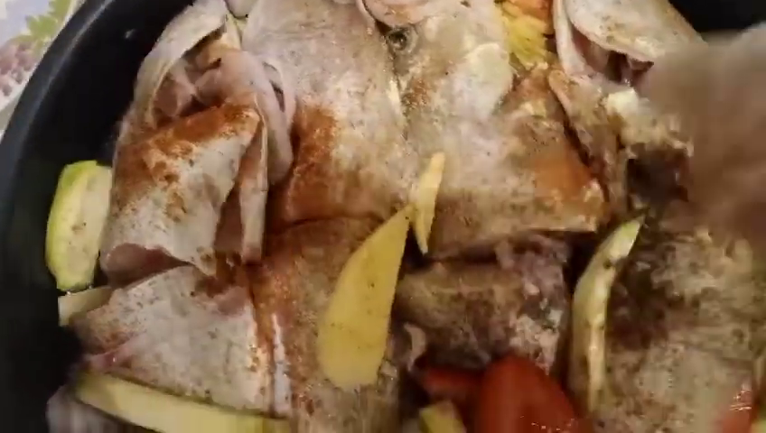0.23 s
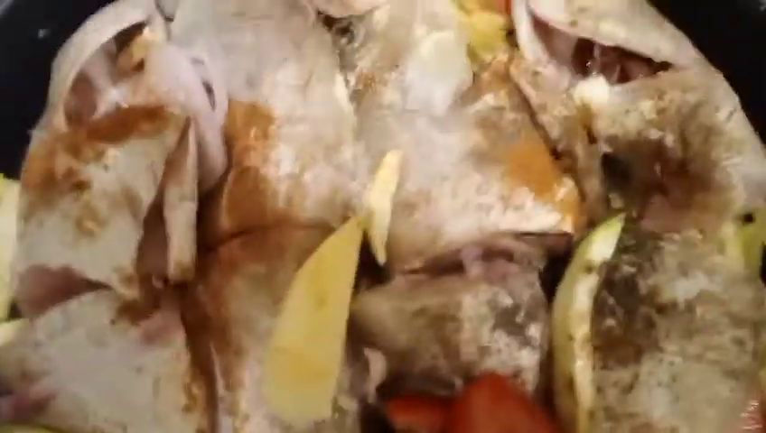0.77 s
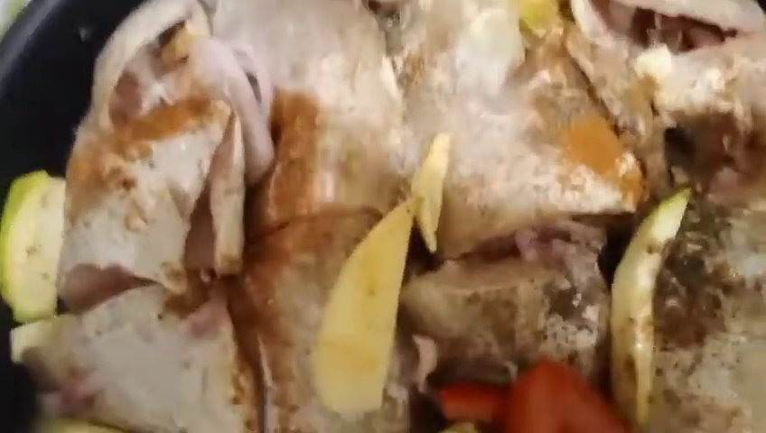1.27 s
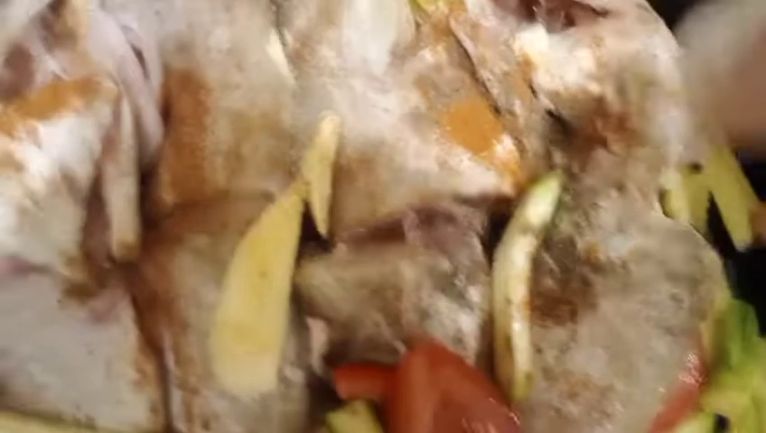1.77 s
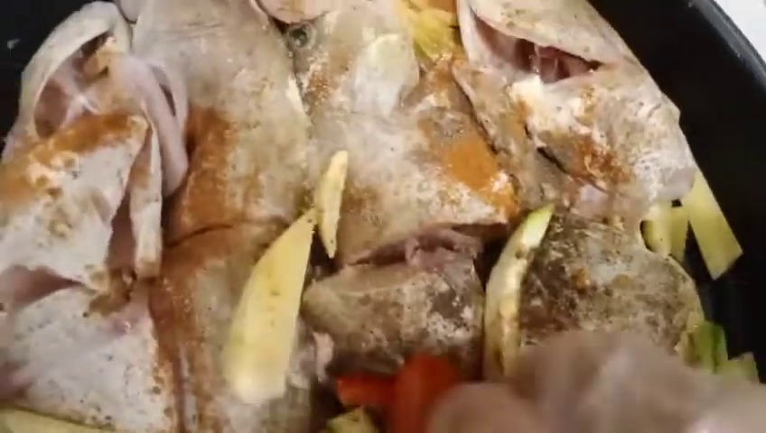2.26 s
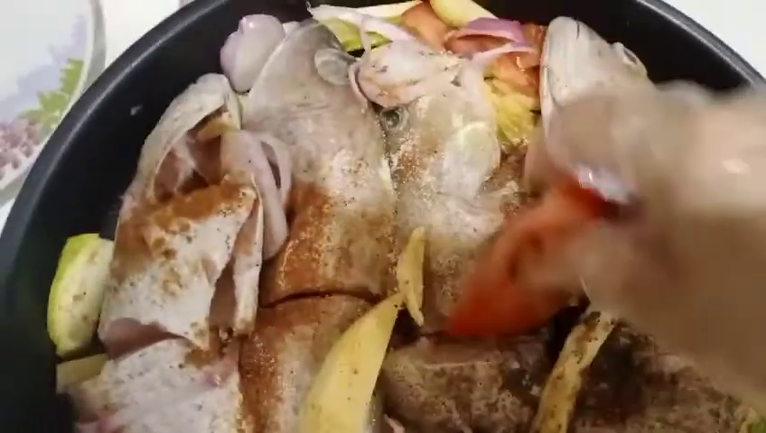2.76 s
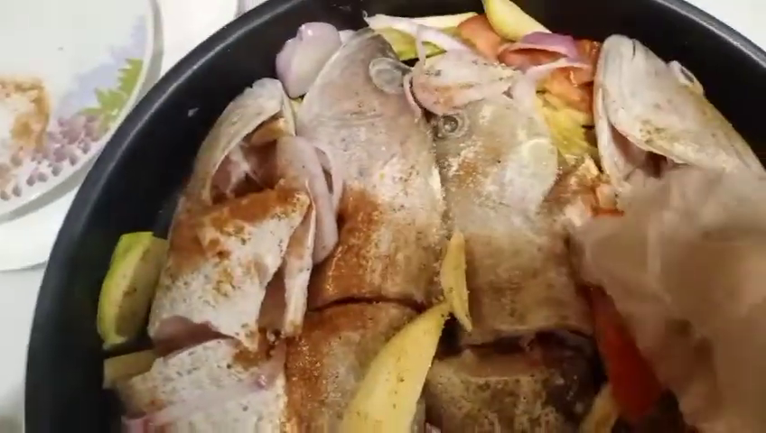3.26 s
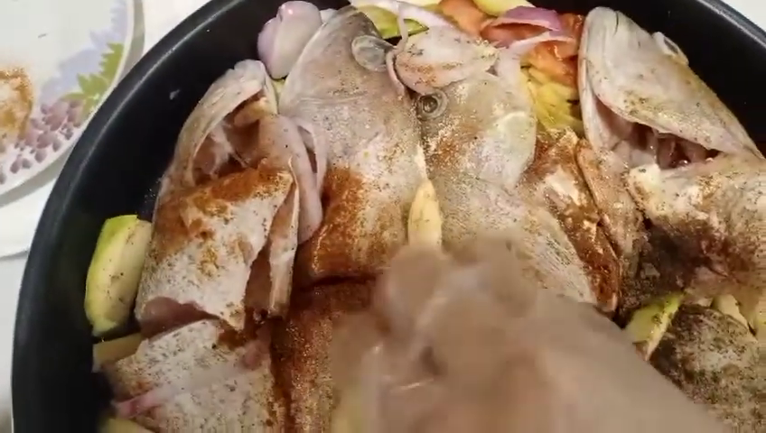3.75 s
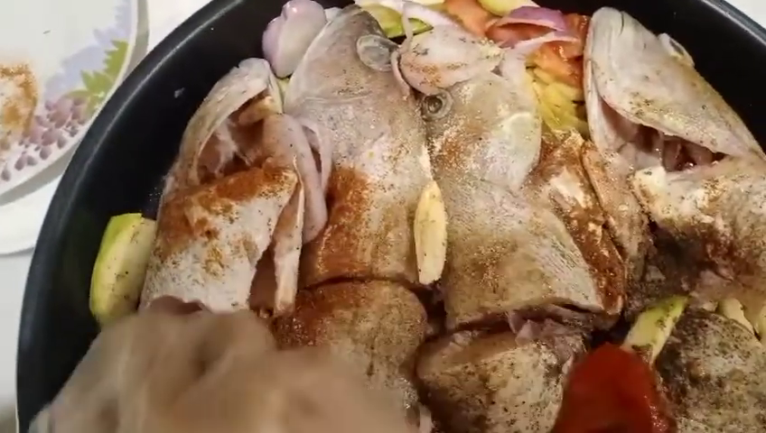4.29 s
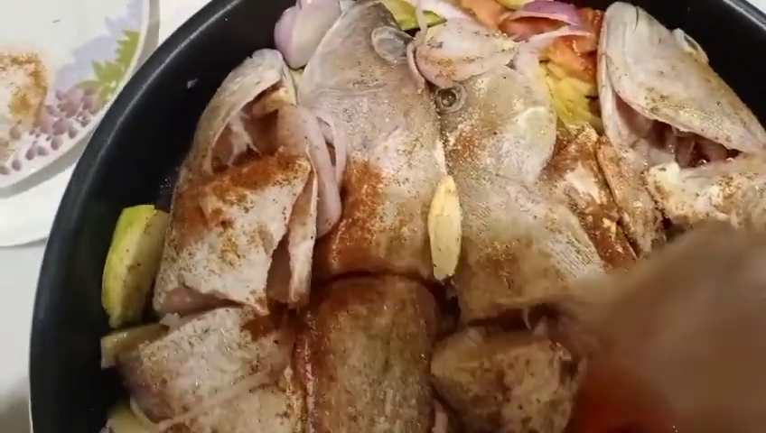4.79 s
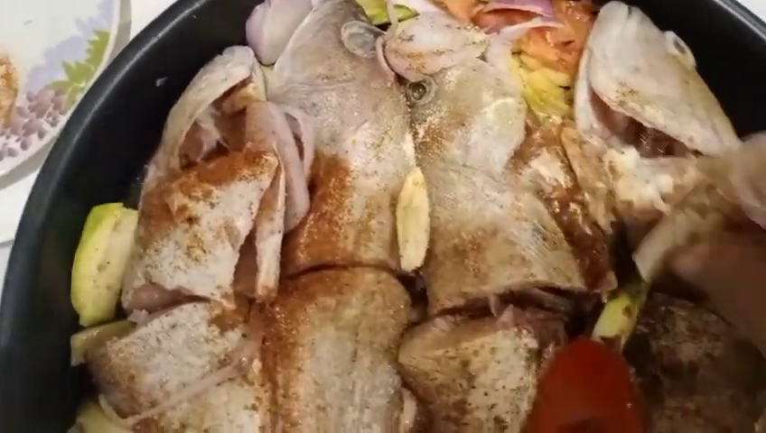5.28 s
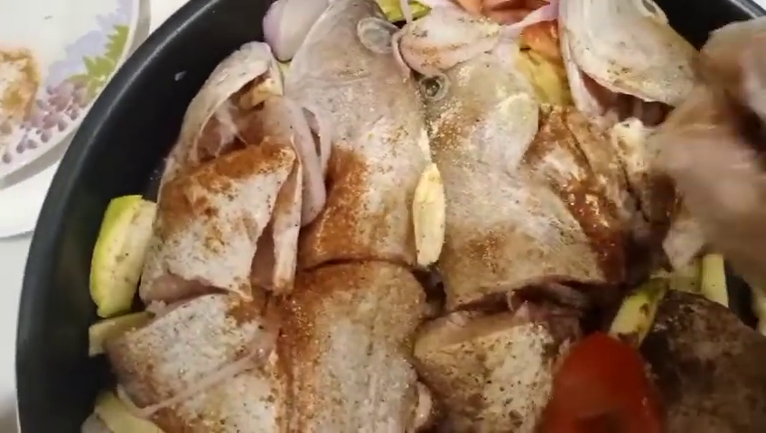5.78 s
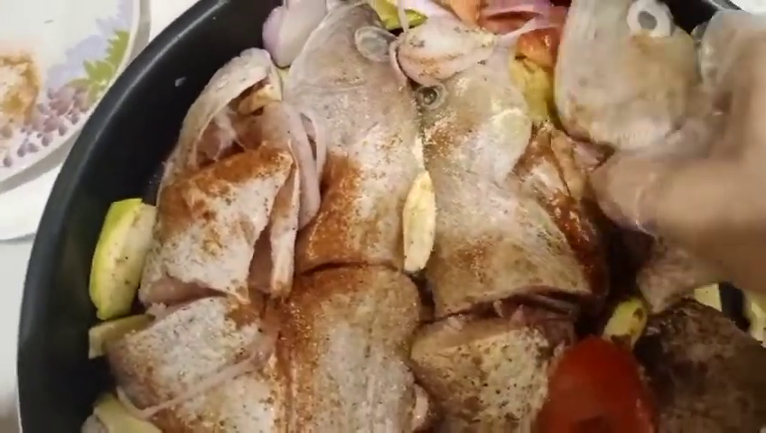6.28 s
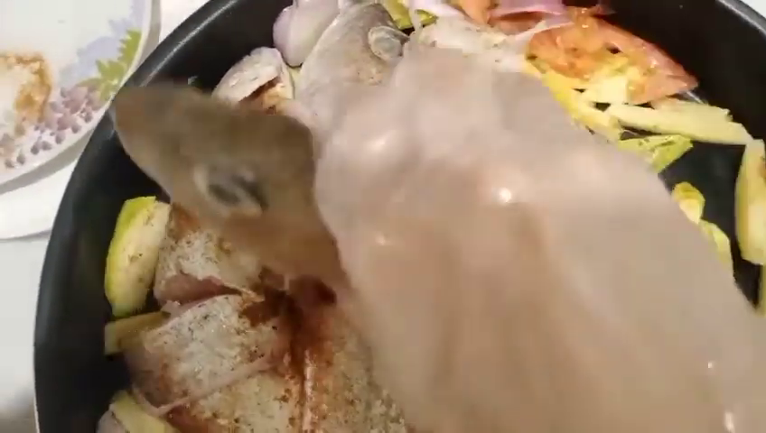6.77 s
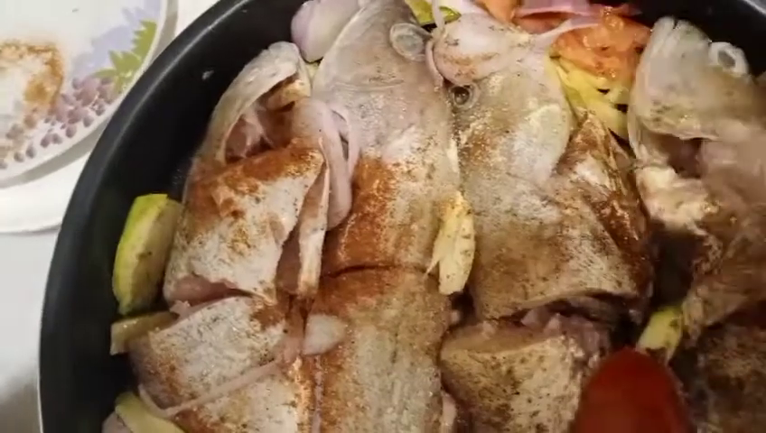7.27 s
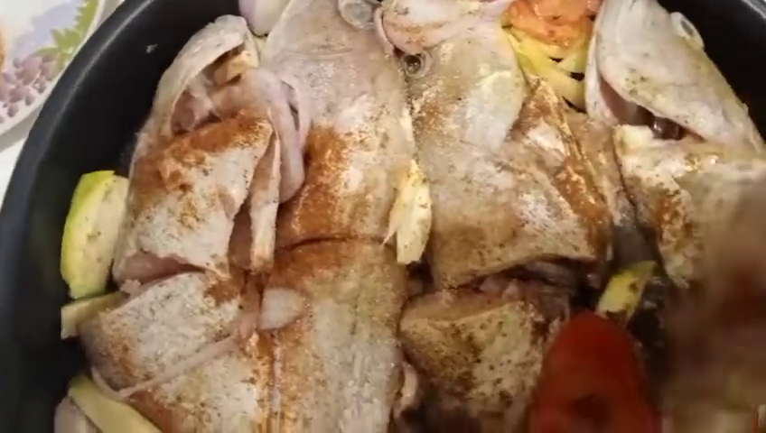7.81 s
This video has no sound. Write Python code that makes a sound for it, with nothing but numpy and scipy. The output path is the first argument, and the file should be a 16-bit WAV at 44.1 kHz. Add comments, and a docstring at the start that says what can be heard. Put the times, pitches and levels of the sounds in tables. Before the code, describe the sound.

Fingers knock and scrape on the camera, then a plastic-gloved hand rubs wet fish with soft crinkles in a quiet kitchen.

```python
"""First comes a soft crinkle: a hand in a thin plastic glove rubs seasoning into raw fish in a pan.
The plastic crinkles with each stroke and crumples when the hand grips; the wet marinade squelches.
Early on, the other hand shifts its hold on the camera, which knocks, ticks, scuffs and hisses right
at the microphone. Later a few sharp ticks come from creases in the plastic.
Behind it all is the quiet hum and rumble of a small kitchen."""
import sys
import numpy as np
from scipy import signal
from scipy.fft import rfft, irfft
from scipy.io import wavfile
from scipy.ndimage import map_coordinates

SR = 44100
rng = np.random.default_rng(int(sys.argv[2]) if len(sys.argv) > 2 else 0)


def materialize(psi):
    """Save the field psi as 16-bit PCM at rate SR to the path in sys.argv[1].

    A 1-D psi becomes a single channel; in a 2-D psi each row is a channel.
    """
    bounded = np.clip(np.atleast_2d(psi).T, -1, 1)
    quanta = np.round(bounded * 32767).astype(np.int16)
    wavfile.write(sys.argv[1], SR, quanta)


N = 354784
TIME = np.arange(N) / SR

# swells of bright hiss from scuffing on the camera (about 0.7-2 s), otherwise glove strokes:
# peak t/s, rise/s, fall/s, bright level/dB, low rustle level/dB
HISS_AND_CRINKLE_SWELLS = [ (0.0, .02, 0.023, -54, -73), (0.11, 0.012, 0.015, -67, -61),
                           (0.18, 0.061, 0.044, -45.5, -68), (0.23, 0.022, 0.011, -47.5, -57.5),
                           (0.695, 0.012, .011, -47.5, -83), (0.915, 0.062, 0.049, -41.5, -74),
                           (1.04, 0.023, 0.02, -46, -78), (1.095, 0.011, 0.016, -43.5, -71),
                           (1.14, 0.012, 0.038, -36, -80), (1.35, 0.058, .07, -45, -63),
                           (1.55, 0.026, 0.05, -42.5, -71), (1.78, .06, 0.07, -52, -80),
                           (1.97, 0.07, 0.047, -56.5, -62.5), (2.165, 0.0084, 0.034, -42, -53),
                           (2.37, 0.069, 0.024, -51, -74), (2.51, 0.093, 0.057, -49, -73),
                           (2.72, 0.053, 0.13, -56.5, -83), (2.88, .05, 0.029, -51.5, -76.5),
                           (2.985, 0.044, 0.057, -49.5, -66.5), (3.13, .025, 0.033, -50.5, -80),
                           (3.23, 0.04, 0.054, -58.5, -86.5), (3.48, 0.024, 0.052, -60.5, -71),
                           (3.585, 0.092, 0.061, -46, -71.5), (3.89, 0.051, 0.036, -54, -79),
                           (4.025, 0.038, 0.034, -54.5, -96), (4.285, 0.028, 0.015, -55.5, -83.5),
                           (4.38, 0.054, 0.037, -56.5, -75), (4.515, 0.035, 0.021, -54.5, -81),
                           (4.66, 0.07, 0.049, -67, -83.5), (4.772, 0.0094, 0.02, -51.5, -80),
                           (5.12, 0.034, 0.036, -44.5, -75), (5.278, 0.0084, 0.036, -58.5, -79),
                           (5.395, .02, 0.021, -56.5, -80), (5.645, 0.042, 0.064, -52.5, -90.5),
                           (5.74, 0.036, 0.069, -51.5, -72), (5.925, 0.044, 0.045, -52.5, -74),
                           (6.08, 0.086, 0.039, -51, -82), (6.17, 0.019, 0.059, -46, -54.5),
                           (6.29, 0.048, 0.063, -47.5, -60), (6.445, 0.044, 0.031, -44, -88),
                           (6.56, 0.083, 0.086, -47.5, -66.5), (6.84, 0.016, 0.039, -48.5, -67),
                           (7.19, 0.029, 0.032, -45, -70.5), (7.295, 0.043, 0.028, -55, -88),
                           (7.405, 0.029, 0.019, -49, -75), (7.56, 0.077, 0.049, -46.5, -69),
                           (7.69, 0.02, 0.021, -50.5, -89), (7.83, 0.019, 0.03, -63, -73),
                           (8.02, 0.023, 0.037, -47.5, -64)]
# tone of tight plastic: f/Hz, level/dB
CRINKLE_SPECTRUM = [(1000, -24.5), (2200, -11), (2800, -18.5), (3400, -1.5), (4200, -5.5), (4900, -1),
                    (5700, 1), (7000, 4), (9000, -3.5), (16000, -7.5)]
# how the highest part of the crinkle gets louder and softer: t/s, level/dB
CRINKLE_TREBLE = [(0, 1), (1, 3.5), (2.9, -1.5), (3.3, -0.5), (4.2, 5.5), (4.7, -7), (5.1, 2.5), (7.1, 3),
                  (8, -2)]
# tone of loose folds: f/Hz, level/dB
FOLD_SPECTRUM = [(600, -33.5), (900, -10), (1400, 3), (2000, 7.5), (2600, 0.5), (3500, 9.5), (6000, -32.5)]
# grips that crumple the glove: peak t/s, level/dB, length/s, rough lower edge f/Hz
GLOVE_CRUMPLES = [(1.152, -44, 0.005, 1490), (1.552, -56, 0.037, 2950), (2.161, -38.5, 0.027, 2400),
                  (2.681, -50, 0.0046, 5000), (2.89, -47.5, 0.01, 2000), (2.977, -43, 0.018, 2830),
                  (3.18, -41, 0.0021, 4850), (4.284, -48, 0.0085, 3380), (4.773, -50, 0.0086, 3130),
                  (4.793, -56.5, 0.036, 3060), (5.13, -45.5, 0.033, 1300), (5.681, -50, .006, 3600),
                  (5.735, -47, .008, 3570), (6.181, -36, 0.015, 1100), (6.278, -39, 0.0072, 2150),
                  (6.446, -37.5, 0.013, 1100), (6.834, -43, 0.013, 1640), (7.162, -48, 0.02, 3000),
                  (7.316, -50, 0.0038, 4770), (7.787, -44.5, 0.0031, 5840), (7.996, -47, 0.015, 3550)]
# ticks from fingers touching the camera and later from plastic creases: t/s, level/dB, f/Hz
SHARP_TICKS = [ (0.699, -32.5, 5500), (0.77, -26, 6200), (0.853, -18.5, 3770), (1.0283, -32, 4120),
               (1.1728, -18.5, 3130), (1.2165, -23, 4900), (1.267, -29.5, 6400), (1.3, -29, 3070),
               (1.319, -28, 3600), (1.4132, -25.5, 3200), (1.449, -29, 4000), (1.561, -27, 3160),
               (1.651, -32, 6000), (1.672, -33, 3630), (1.7016, -36, 5700), (1.745, -32, 4900),
               (1.9444, -32.5, 6700), (1.9894, -38, 6600), (2.8876, -28, 5970), (2.9816, -28.5, 5800),
               (5.9217, -26.5, 7460), (6.3087, -26.5, 6300),]
# air and marinade squeezed out: peak t/s, level/dB, length/s, f/Hz, glide/(octaves per s)
WET_SQUELCHES = [ (0.163, -62.5, 0.14, 2050, 0), (2.184, -53.5, 0.025, 1567, 0),
                 (2.382, -56.5, 0.047, 3690, -1.2), (2.503, -67, 0.034, 3400, 0),
                 (2.89, -56, 0.015, 2250, -.25), (2.978, -53, 0.028, 3280, 0), (3.60, -57, 0.096, 3585, .8),
                 (4.506, -59, 0.015, 4000, .27), (4.77, -52, 0.014, 4150, 0), (5.121, -58, 0.016, 1800, -1),
                 (6.108, -63.5, 0.04, 1610, .86), (6.197, -45, 0.027, 1620, -2),
                 (6.328, -57, 0.019, 1627, .74), (6.42, -54, .07, 1310, -1.5),
                 (6.455, -61.5, 0.067, 1135, -2), (6.686, -67.5, 0.11, 2250, -.24),
                 (6.84, -54, 0.024, 1760, .18), (7.433, -65, 0.1, 1327, -.29),
                 (7.547, -60.5, 0.08, 1318, -.77)]
# fingers knocking on the camera: t/s, clack level/dB, f/Hz, length/s, thud level/dB
FINGER_KNOCKS = [ (0.6643, -35, 1100, 0.002, -36), (0.673, -25.5, 185, 0.0066, -39),
                 (0.685, -21.5, 182, 0.0059, -38), (0.6933, -23.5, 463, 0.00035, -30.5),
                 (0.7024, -40, 596, 0.00068, -32), (0.8054, -29, 513, 0.0047, -42),
                 (0.852, -9, 520, 0.00041, -14), (0.9309, -27.5, 550, 0.001, -29.5),
                 (1.1385, -16.5, 404, 0.0035, -47), (1.1509, -13.5, 600, 0.00051, -13),
                 (1.1571, -9.5, 1000, 0.0016, -22), (1.1605, -12, 867, .0006, -37),
                 (1.173, -10.5, 922, 0.0014, -34), (1.179, -18.5, 940, .002, -52),
                 (1.1895, -11.5, 547, 0.0019, -19.5), (1.216, -17, 848, 0.0005, -29),
                 (1.2435, -18.5, 850, 0.001, -12), (1.2766, -24.5, 515, 0.0035, -44),
                 (1.3189, -19, 970, 0.0015, -46), (1.3283, -24, 570, 0.0025, -48),
                 (1.4043, -22.5, 940, 0.0015, -45), (1.413, -14.5, 1130, 0.0002, -36),
                 (1.4161, -20, 990, 0.0013, -37), (1.5236, -10.5, 800, 0.0015, -20.5),
                 (1.5615, -16.5, 1105, .0012, -35), (1.594, -28.5, 444, 0.0043, -34),
                 (1.6514, -26, 1220, 0.0043, -50), (1.669, -17.5, 860, 0.0013, -14),
                 (1.702, -30, 1000, .0017, -46), (1.738, -20.5, 980, 0.002, -54),
                 (1.788, -17.5, 620, 0.0019, -53), (1.919, -26.5, 483, 0.0036, -40),
                 (1.968, -24.5, 800, 0.0007, -26.5)]
# skin sliding on the camera: peak t/s, rise/s, fall/s, rub level/dB, scratch level/dB
SKIN_SCUFFS = [ (0.70, .012, 0.012, -41, -45), (0.80, .025, 0.045, -45, -56.5),
               (0.875, .018, 0.059, -45.5, -43), (0.97, .02, .025, -50.5, -63),
               (1.045, 0.0095, 0.017, -53, -44.5), (1.095, .012, 0.019, -65, -52),
               (1.15, .012, 0.021, -29.5, -35), (1.178, .012, .014, -37, -37),
               (1.265, 0.06, .025, -50, -52), (1.322, .018, 0.016, -57, -38.5),
               (1.405, .045, 0.021, -45, -46.5), (1.465, 0.046, 0.023, -58.5, -50.5),
               (1.59, .04, 0.029, -44.5, -47), (1.74, 0.035, 0.03, -46.5, -39),
               (1.80, .025, 0.047, -43, -45), (1.975, .02, 0.013, -50.5, -54.5)]
# tone of the skin's dull rub: f/Hz, level/dB
RUB_SPECTRUM = [(30, -26), (70, -29), (130, 0.5), (220, -4.5), (350, -0.5), (600, -8.5), (1500, -33.5)]
# tone of the skin's rough scratch: f/Hz, level/dB
SCRATCH_SPECTRUM = [(250, -11), (600, -0.5), (1100, 8.5), (1700, -1.5), (2500, -1.5), (4000, -6),
                    (8000, -38.5)]
# soft low rumbles: peak t/s, level/dB, length/s
LOW_RUMBLES = [ (0.569, -54, .027), (2.202, -62, 0.1), (4.365, -64, 0.44), (5.156, -52.5, 0.13),
               (6.0, -58.5, 0.23), (6.952, -58.5, 0.23), (7.42, -59, 0.035), (7.897, -62, 0.2)]
# tone of those rumbles: f/Hz, level/dB
RUMBLE_SPECTRUM = [(30, -8), (80, -6), (100, -11), (118, 22), (145, -1.5), (220, -4), (400, -29)]
# tone of the quiet room: f/Hz, level/dB
ROOM_SPECTRUM = [(25, -14), (60, -13), (120, 4.5), (240, 1), (320, 4), (420, -8), (900, -4.5), (1500, -7),
                 (2500, -11.5), (4500, -25), (7200, -35.5), (7800, -3.5), (8800, -20.5), (16000, -39)]
# the microphone's opening makes a deep dip in the treble: f/Hz, level/dB
MICROPHONE_RESPONSE = [(20, 3), (7300, -1), (8200, -4.5), (9200, -17.5), (10500, -16.5), (11300, -18.5),
                       (12300, -9), (13500, -7), (16000, -9)]


def crinkle_and_hiss():
    """Tight plastic crinkles, loose folds rustle lower; the same noise is the camera scuffs' hiss."""
    high, low = pushes(HISS_AND_CRINKLE_SWELLS, roundness=1.62)
    high, low = high + from_db(-82), low + from_db(-79.5)   # the glove is never quite still
    bright = crinkle(per_s=6000, spread_db=4.5, clump_db=2, flicker_db=.5)
    pops = from_db(-11.5) * stiff_creases(per_s=400, width_hz=350)
    rustle = rms_one(colour(clicks(per_s=3000, spread_db=-.5), FOLD_SPECTRUM))
    hollow = air_pockets(rustle, low_hz=1100, high_hz=3400, width_hz=8.5)
    folds = from_db(-5) * rustle + from_db(-3.5) * hollow
    return from_db(-1) * high * (bright + pops) + low * folds


def crinkle(per_s, spread_db, clump_db, flicker_db, bands=17):
    """Creases buckle in clumps; each shakes the whole plastic, at some pitches more than others."""
    creases = clicks(per_s, spread_db) * from_db(clump_db * drift(45))
    treble = from_db(np.interp(TIME, *np.transpose(CRINKLE_TREBLE)))
    edges_hz, out = np.geomspace(600, 17000, bands + 1), 0
    for low, high in zip(edges_hz, edges_hz[1:]):
        strengths = 1 + .97 * rng.standard_normal(N)
        # the glove keeps changing shape, and its tone changes with it
        gain = from_db(at_hz(CRINKLE_SPECTRUM, np.sqrt(low * high)) + flicker_db * drift(7.6))
        if low > edges_hz[-1] / 2:
            gain = gain * treble
        out = out + gain * band(creases * strengths, low, high)
    return rms_one(out)


def stiff_creases(per_s, width_hz, count=12):
    """Stiffer creases pop one at a time, each with a short ring of its own pitch."""
    pitches = np.geomspace(3500, 7800, count) * rng.uniform(.97, 1.03, count)
    return rms_one(sum(resonate(clicks(per_s / count, spread_db=5.5), hz, width_hz) for hz in pitches))


def air_pockets(rustle, low_hz, high_hz, width_hz, count=16):
    """Air pockets between hand, plastic and fish ring briefly, opening and closing as the hand moves."""
    pitches = np.geomspace(low_hz, high_hz, count) * rng.uniform(.97, 1.03, count)
    out = 0
    for hz in pitches:
        opening = from_db(8 * np.tanh(drift(4)))
        out = out + resonate(rustle * opening, hz, width_hz)
    return rms_one(out)


def crumples():
    """A grip sets off a rush of creases that starts fast and dies away; a wider fold reaches lower."""
    out, t = np.zeros(N), np.arange(-SR // 12, SR // 12) / SR
    for s, db, length, low_hz in GLOVE_CRUMPLES:
        creases = clicks(per_s=11000, spread_db=6.5, size=len(t))
        body = rms_one(band(band(creases, low_hz * .9, 7830), low_hz * .9, 7830))
        sizzle = from_db(-4) * rms_one(band(creases, 11000, 16000))
        shape = swell(t, length * np.where(t < 0, .8, 1.2))
        add(out, s + t[0], from_db(db - 4) * (body + sizzle) * shape)
    return out


def sharp_ticks(decay_s, ring_width_hz):
    """Sharp ticks with a short ring, from fingers touching the camera and later from plastic creases."""
    out, t = np.zeros(N), np.arange(SR // 100) / SR
    for s, db, hz in SHARP_TICKS:
        burst = rng.standard_normal(len(t)) * np.exp(-t / decay_s)
        crack = band(band(burst, hz * .8, hz * 2.1), hz * .8, hz * 2.1)
        ring = resonate(1.0 * (t == 0), hz, ring_width_hz)
        tick = crack / np.abs(crack).max() + .5 * ring / np.abs(ring).max()
        add(out, s - .0002, from_db(db + .5) * tick / np.abs(tick).max())
    return out


def squelches(width_hz):
    """Tiny wet bursts make a small hollow ring; its pitch can slide as it is squeezed."""
    out, t = np.zeros(N), np.arange(-SR // 6, SR // 6) / SR
    for s, db, length, hz, glide in WET_SQUELCHES:
        bursts = rng.standard_normal(len(t)) + 1j * rng.standard_normal(len(t))
        ringing = signal.lfilter([1], [1, -np.exp(-np.pi * width_hz / SR)], bursts)
        shape = swell(t, length)
        ringing /= np.sqrt(np.average(np.abs(ringing) ** 2, weights=shape ** 2) / 2)
        phase = 2 * np.pi * np.cumsum(hz * 2 ** (glide * t)) / SR
        pitched = np.real(ringing * np.exp(1j * phase))   # lifts the ringing up to its pitch
        add(out, s + t[0], from_db(db) * shape * pitched)
    return out


def knocks(thud_hz, thud_s, thud_lag_s):
    """A finger hits the camera with a short clack, and the case answers with a low thud."""
    out, t = np.zeros(N), np.arange(-SR // 100, SR // 20) / SR
    for s, db, hz, length, thud_db in FINGER_KNOCKS:
        clack = from_db(db) * swing(t, hz, length)
        thud = from_db(thud_db) * swing(t - thud_lag_s, thud_hz, thud_s)
        add(out, s + t[0], clack + thud)
    return band(band(out, 135, 2800), 55, 12000)


def scuffs():
    """Skin sticks and slips unevenly on the camera, with small taps and ticks where it catches."""
    rub, scratch = pushes(SKIN_SCUFFS, roundness=1.56)
    lumps = from_db(2.5 * drift(60))
    dull = rms_one(colour(lumps * clicks(per_s=2600, spread_db=-1.5), RUB_SPECTRUM))
    rough = rms_one(colour(lumps * clicks(per_s=4000, spread_db=2), SCRATCH_SPECTRUM))
    catches = clicks(per_s=135, spread_db=-.5)
    taps = from_db(-6) * rms_one(band(catches, 450, 1300))
    ticks = from_db(-14.5) * rms_one(band(catches, 2100, 7000))
    return from_db(2.5) * rub * band(dull, 120, 1600) + scratch * (from_db(-.5) * rough + taps + ticks)


def near_echoes(x, strength=.5):
    """Sound bounces off pan, worktop and hand; the tone shifts as the moving hand changes the delays."""
    out = x
    for delay_s in (.0008, .0016, .0027):
        lag = delay_s * SR * (1 + .1 * drift(1))
        out = out + strength * map_coordinates(x, [np.arange(N) - lag], order=3)
    return out / np.sqrt(1 + 3 * strength ** 2)


def kitchen_walls(x, fade_s):
    """Hard walls add a short blur of echoes that drops 60 dB in fade_s."""
    t = np.arange(SR // 2) / SR
    tail = band(rng.standard_normal(len(t)), 300, 5700) * from_db(-60 * t / fade_s) * (t > .004)
    return signal.oaconvolve(x, tail / np.sqrt(np.sum(tail ** 2)))[:N]


def background():
    """The steady noise of the room, with a soft low rumble now and then."""
    swells = sum(from_db(db) * swell(TIME - s, length) for s, db, length in LOW_RUMBLES)
    rumble = from_db(-6.5) * swells * rms_one(colour(rng.standard_normal(N), RUMBLE_SPECTRUM))
    return rumble + from_db(-69) * rms_one(colour(rng.standard_normal(N), ROOM_SPECTRUM))


def pushes(rows, roundness):
    """Hand pushes swell and ease off: one loudness curve per level column. Roundness 1 is pointed."""
    t, powers = TIME[::20], 0
    for s, rise, fall, *levels_db in rows:
        away = np.abs(t - s) / np.where(t < s, rise, fall)
        shape = 2 ** -np.minimum(away ** roundness, 20)   # half height one rise or fall from the peak
        powers = powers + np.outer(from_db(levels_db), shape) ** 2
    return [np.interp(TIME, t, np.sqrt(power)) for power in powers]


def clicks(per_s, spread_db, size=N):
    """Clicks at random times; the further spread_db is from 0, the more their sizes vary."""
    heights = from_db(spread_db * np.minimum(rng.exponential(1, size), 5))
    return rms_one(heights * rng.choice([-1, 1], size) * (rng.random(size) < per_s / SR))


def drift(rate_hz):
    """A smooth random wander, typically about 1 away from zero."""
    r = np.exp(-40 * np.pi * rate_hz / SR)
    slow = signal.lfilter([1], [1, -2 * r, r * r], rng.standard_normal(N // 20 + 2002))[2000:]
    return np.interp(np.arange(N) / 20, np.arange(len(slow)), rms_one(slow))


def swell(t, length):
    """A smooth bump of height 1, half as high at +- length / 2."""
    return 2 ** -np.minimum((2 * t / length) ** 2, 60)


def swing(t, hz, length):
    """A vibration that peaks at t = 0 and dies almost at once."""
    age = np.maximum(1 + t / (length * .57), 0)
    return (age * np.exp(1 - age)) ** 4 * np.cos(2 * np.pi * hz * t)


def resonate(x, hz, width_hz):
    """Makes x ring at one pitch; a smaller width rings longer."""
    r = np.exp(-np.pi * width_hz / SR)
    return signal.lfilter([1, 0, -1], [1, -2 * r * np.cos(2 * np.pi * hz / SR), r * r], x + 1e-18)


def band(x, low_hz, high_hz):
    """Keeps the part of x between two frequencies."""
    sections = signal.butter(2, [low_hz, min(high_hz, .45 * SR)], "band", fs=SR, output="sos")
    return signal.sosfilt(sections, x + 1e-18)


def colour(x, spectrum, size=2048):
    """Gives x the tone listed in a spectrum table."""
    cepstrum = irfft(np.log(from_db(at_hz(spectrum, np.fft.rfftfreq(size, 1 / SR)))))
    cepstrum[1:size // 2] *= 2
    cepstrum[size // 2 + 1:] = 0   # so the filter rings only after a click, never before
    return signal.oaconvolve(x, irfft(np.exp(rfft(cepstrum))))[:len(x)]


def at_hz(spectrum, hz):
    """Looks up the level in dB at a frequency."""
    known_hz, level = np.transpose(spectrum)
    return np.interp(np.log(np.maximum(hz, 1)), np.log(known_hz), level)


def from_db(db):
    return 10 ** (np.asarray(db) / 20)


def rms_one(x):
    """Scales x to an average power of 1."""
    return x / np.sqrt(np.mean(x ** 2) + 1e-20)


def add(out, start_s, sound):
    at = max(round(start_s * SR), 0)
    out[at:at + len(sound)] += sound[:max(N - at, 0)]


def scene():
    """Sounds in the air echo in the kitchen; knocks and scuffs go through the camera, with no echo."""
    in_air = near_echoes(crinkle_and_hiss() + crumples())
    in_air = in_air + sharp_ticks(decay_s=.00031, ring_width_hz=260) + squelches(width_hz=81)
    handling = knocks(thud_hz=279, thud_s=.0057, thud_lag_s=.0014) + scuffs()
    echoes = from_db(-17) * kitchen_walls(in_air, fade_s=.054)
    return (in_air + echoes + handling + background())[None]


def record(dry):
    """The microphone dulls the treble, and the very highest sounds are cut off."""
    heard = colour(dry[0], MICROPHONE_RESPONSE)
    return signal.sosfilt(signal.ellip(12, .1, 70, 15850, fs=SR, output="sos"), heard)[None]


dry = scene()
out = record(dry)
materialize(out)
```